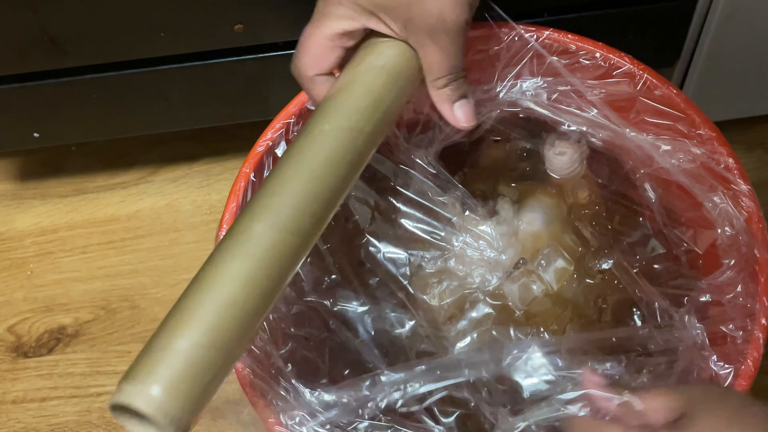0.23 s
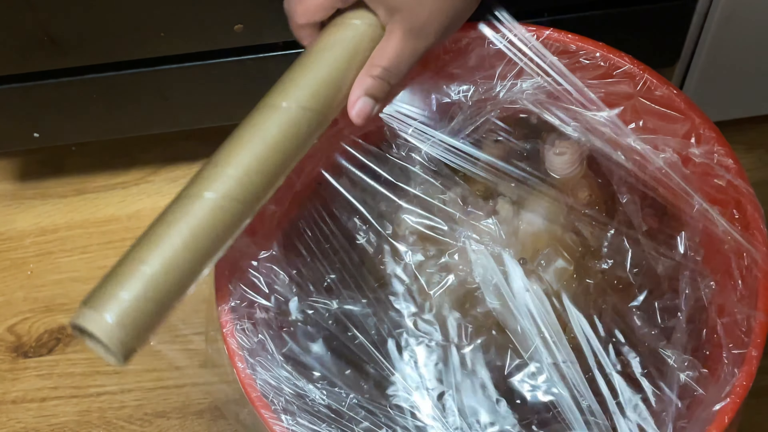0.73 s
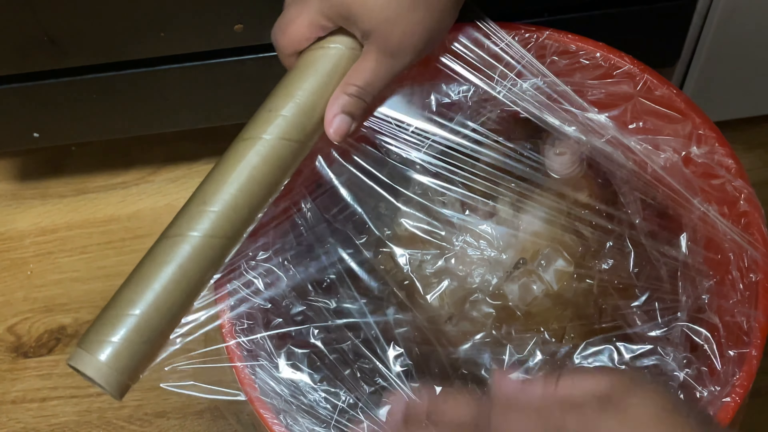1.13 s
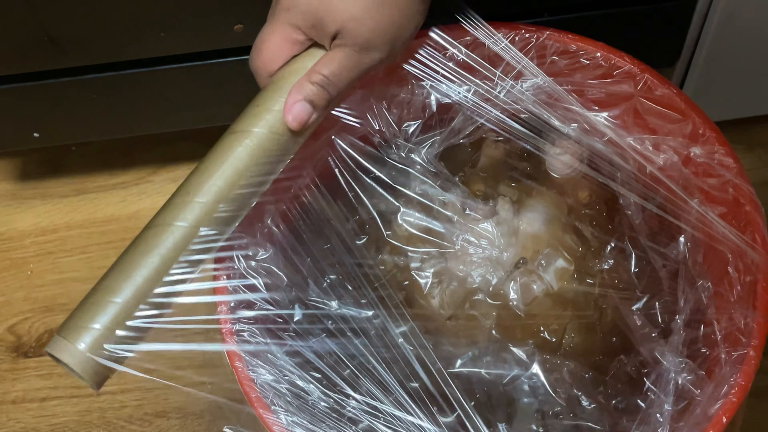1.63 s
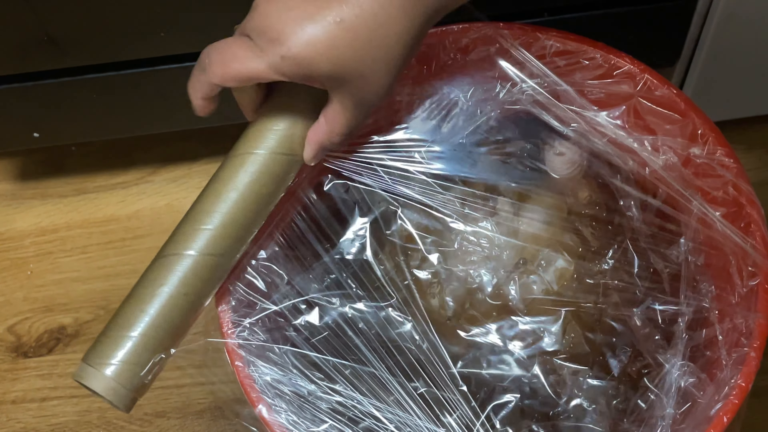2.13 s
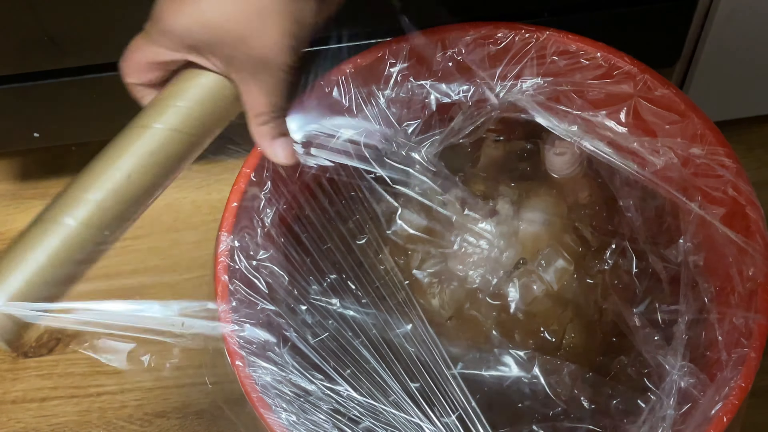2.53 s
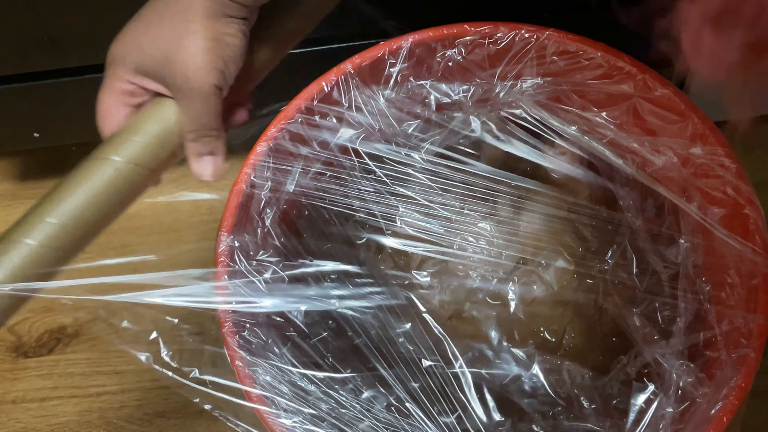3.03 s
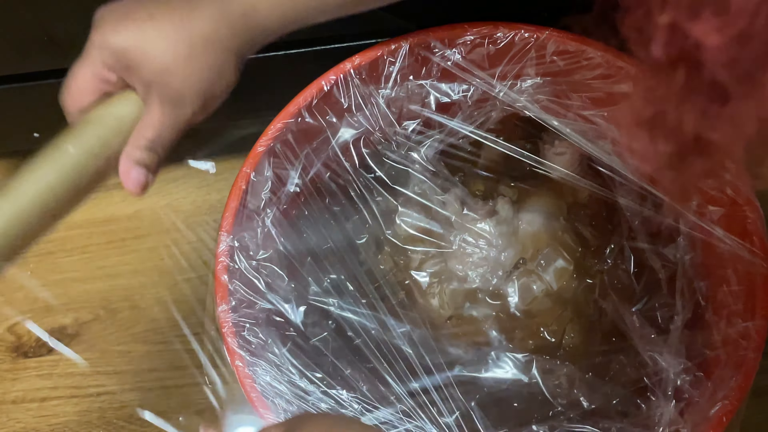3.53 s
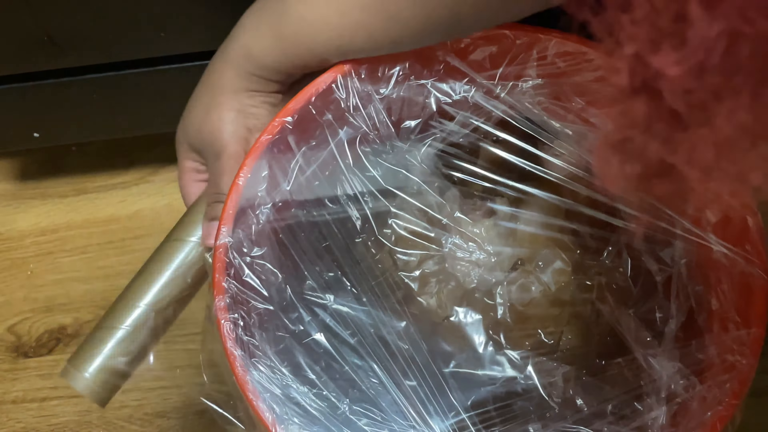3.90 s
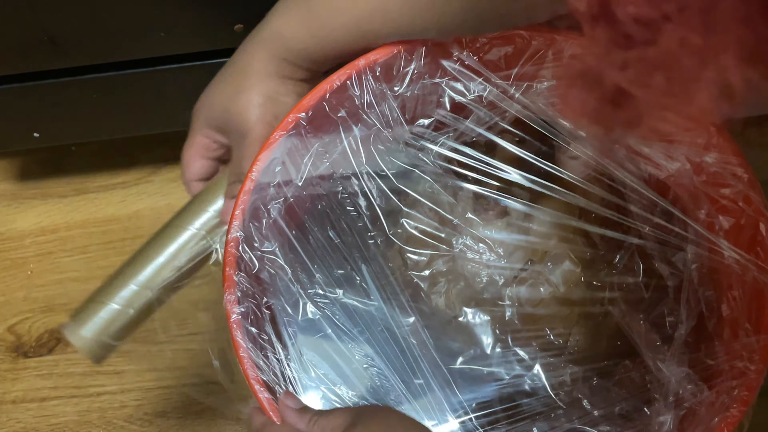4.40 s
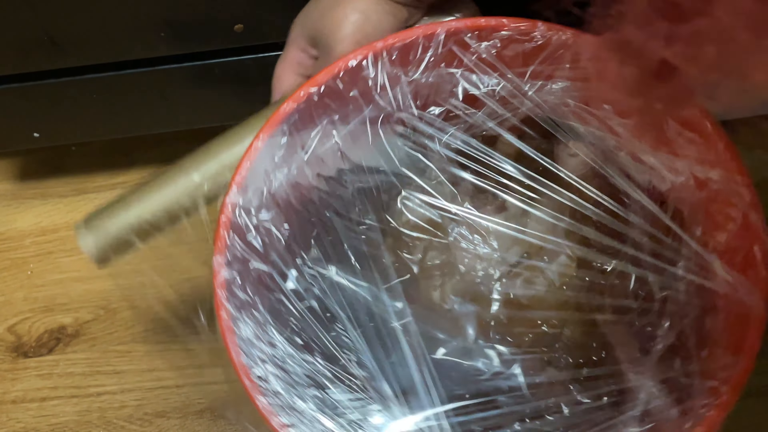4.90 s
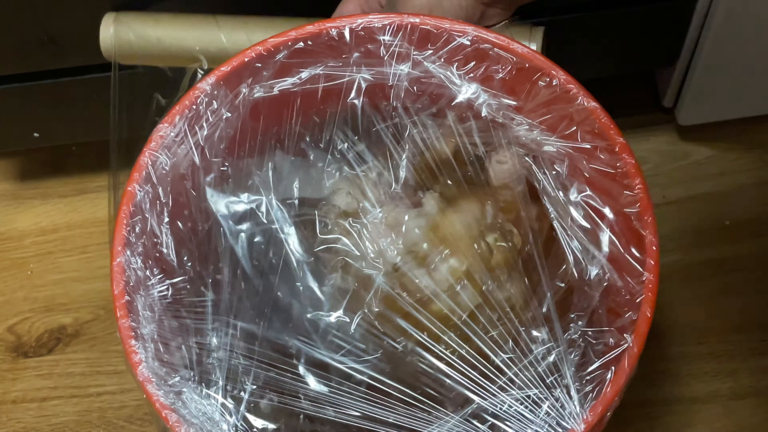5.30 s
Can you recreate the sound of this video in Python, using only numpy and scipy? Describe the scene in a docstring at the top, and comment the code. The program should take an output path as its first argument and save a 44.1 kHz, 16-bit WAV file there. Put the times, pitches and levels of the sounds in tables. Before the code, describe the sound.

Cling film is worked over a plastic bucket in a small, fairly dry kitchen, heard close in stereo. A faint low appliance hum and soft rumble run throughout. Light rustling opens the scene, then a cluster of hard, dry snaps with papery crackle hits around 0.45 s. Smaller crinkles follow, with a snap near 1.3 s and dull, drum-like thuds at about 1.75 s. After a quieter moment, the strongest pop comes at 2.25 s, the taut sheet thudding with a quickly falling pitch. Activity thins until 2.9 s, then dense sharp snapping runs from 3.1 to 3.6 s with soft low bumps of the bucket. A brief hollow plastic knock sounds at 3.9 s. Softer rustles follow, becoming a busy run of bright crinkles from 4.6 to 5.2 s. From about 5.2 s the bucket scrapes grittily over the boards, loudest near 5.5 s.

```python
"""A kitchen floor, where cling film comes off a cardboard roll and is stretched over a plastic bucket.
The film crinkles in swelling gritty noise and snaps in dry cracks with blurred rings; strong snaps set the
taut sheet thudding like a drum skin. The bucket bumps and rings as decaying sines, and finally slides in
dense noise grains. An appliance hums as wavering sines over filtered noise; two close ports pick it all up."""
import sys
import numpy as np
from scipy import signal
from scipy.fft import rfft, irfft, next_fast_len
from scipy.io import wavfile
from scipy.ndimage import map_coordinates

SR = 44100
rng = np.random.default_rng(int(sys.argv[2]) if len(sys.argv) > 2 else 0)


def store_pcm(level_fs):
    """Save levels as 16-bit WAV."""
    pcm = np.round(np.clip(level_fs, -1, 1) * 32767).astype(np.int16)
    wavfile.write(sys.argv[1], SR, np.atleast_2d(pcm).T)


def field_ratio(decibels):
    """Amplitude ratio for a level in dB (20 dB per decade); scalars and array-likes work."""
    return 10 ** (np.asarray(decibels, dtype=float) / 20)


N = 244735  # length in samples

# appliance tones: f/Hz, rms level/dB, wavering/dB (held within 0 to 4)
HUM_TONES = [(59.6, -56, 0), (114.9, -62, 2.5), (149.2, -68.5, -1), (194.6, -48.5, 1.1), (288, -69.5, 3),
             (469.5, -62, 2.5), (770, -69.5, 3), (1196, -70.5, 1.5)]
# spectrum of the air noise: f/Hz, relative level/dB
AIR_SPECTRUM = [(60, -28), (100, -9.5), (130, -5), (250, -7.5), (480, -15), (540, -20), (1100, -53),
                (2000, -33.5), (7000, -42.5), (15500, -49), (17000, -70)]
# spectrum of the rumble: f/Hz, relative level/dB
RUMBLE_SPECTRUM = [(20, -33), (35, -11.5), (55, 1), (75, -2.5), (100, -4.5), (200, -58)]
RUMBLE_DB, RUMBLE_SWING_DB = -55.5, 2  # distant rumble and its slow drift

# the bucket rocks and bumps the boards: t/s, relative level/dB, f/Hz
BUMPS = [(1.759, -37, 146), (2.28, -39, 166), (3.124, -36, 101), (3.43, -38.5, 84), (3.627, -38, 111),
         (5.378, -35, 98)]
# the roll knocks the bucket wall: t/s, relative level/dB
KNOCKS = [(3.9043, -18.5), (3.9290, -27.5)]
# modes of the bucket wall: f/Hz, relative level/dB, t60/s
WALL_MODES = [(1260, -5.5, .04), (1480, -10, .04), (1790, -14, 0.11), (2010, -9, 0.099), (2070, -15, 0.051),
              (2040, 2.5, 0.017), (2280, -10, 0.028), (2850, -9.5, 0.049)]
# the bucket dragged over the boards: t/s, level/dB
SLIDE_LEVEL = [(4.8, -68), (4.9, -51), (5.2, -47.5), (5.3, -35.5), (5.5, -30.5), (5.55, -37)]
# spectrum of the scraping base: f/Hz, relative level/dB
SCRAPE_SPECTRUM = [(60, -31), (97, 5), (150, -21), (260, -4), (470, 7), (640, -8), (830, 9), (1100, 1.5),
                   (2000, 5.5), (3500, -1.5), (7000, -14.5), (20000, -59)]

# tugs of the hands, each a swell of rustle: t/s of the peak, relative level/dB, rise/s and fall/s (over 20 dB),
# slack/dB (more = lower, floppier sound)
TUGS = [(.12, -57, 0.51, 0.13, -8), (.305, -45, 0.2, 0.028, 0.5), (0.446, -34, .14, 0.14, -0.5),
        (.49, -51, 0.049, 0.076, -4), (.6, -44, 0.22, 0.29, 0), (.75, -41, 0.086, 0.13, 0),
        (.82, -41.5, .1, 0.037, 1), (.96, -58, 0.027, 0.066, 8), (1.032, -48, 0.089, 0.11, 1.5),
        (1.22, -78, 0.022, 0.11, -18), (1.299, -36.5, 0.013, 0.031, 0), (1.439, -46, 0.2, 0.09, 5),
        (1.55, -48, 0.26, 0.24, -2.5), (1.64, -46.5, 0.032, 0.2, -2.5), (1.762, -56, 0.012, 0.051, 21.5),
        (1.841, -40.5, 0.019, 0.069, -4.5), (1.96, -51.5, 0.026, 0.061, 9), (2.12, -62, .2, 0.35, 4),
        (2.27, -35.5, 0.032, 0.057, 6.5), (2.3, -44.5, .04, 0.13, 6), (2.61, -45, 0.15, 0.073, 4),
        (2.77, -55, 0.027, 0.091, 5), (2.94, -49.5, .13, 0.17, 0.5), (3.11, -57.5, 0.061, 0.14, 15),
        (3.15, -35, .02, 0.024, 2), (3.212, -42.5, 0.022, 0.085, 9), (3.428, -38, 0.07, 0.084, 3),
        (3.628, -40, 0.051, 0.12, 1.5), (3.772, -40.5, 0.043, 0.1, 1), (3.909, -50, 0.036, .11, 14.5),
        (4.138, -47.5, 0.13, 0.27, 0), (4.27, -46, 0.071, 0.056, -10.5), (4.34, -43.5, 0.025, 0.11, 2),
        (4.4, -51, 0.02, 0.045, -2), (4.55, -47.5, 0.032, 0.079, 6.5), (4.651, -38, .12, 0.063, -1.5),
        (4.715, -49.5, 0.02, .05, 8.5), (4.738, -40, 0.039, 0.099, 1), (4.844, -47, 0.024, 0.04, 1),
        (4.87, -43.5, 0.038, 0.059, 4), (4.952, -40, 0.0083, 0.087, 0), (4.99, -48.5, .04, 0.025, -2),
        (5.13, -36, .012, 0.056, -1), (5.41, -48.5, 0.63, 1.7, 8)]
REST_DB = -69  # rustle between tugs, relative like the tugs
CREASE_FOLLOWS, FLAP_FOLLOWS = 0.98, 1.086  # dB gained by creases and flaps per dB of slack
# spectrum of the bright film: f/Hz, relative level/dB
FILM_SPECTRUM = [(1500, -10), (3500, -2.5), (4500, -1.5), (6500, -2.5), (9000, -3), (13000, -10),
                 (15500, -4.5), (20000, -5.5)]
# spectrum of the creases: f/Hz, relative level/dB
CREASE_SPECTRUM = [(500, -59), (900, -4.5), (1300, 3), (2000, 2.5), (3000, 1.5), (4000, -5), (7000, -16)]
# spectrum of the flapping sheet: f/Hz, relative level/dB
SHEET_SPECTRUM = [(80, -32), (200, 0.5), (300, 0.5), (420, 0), (560, -5), (680, -4.5), (810, -2),
                  (1100, -10), (2000, -36)]

# snaps of the film: t/s, then relative crack level/dB, crease level/dB and thud level/dB, nominal thud f/Hz
SNAPS = [(0.2935, -33.5, -43, -30.5, 376), (0.3638, -48, -43, -37, 447), (0.4461, -19.5, -13.5, -21, 360),
         (0.4595, -31, -24, -24, 333), (0.485, -19, -17, -27, 425), (0.5795, -30, -24, -38, 660),
         (.66, -29.5, -24.5, -54, 420), (.7744, -38, -26, -35.5, 860), (.828, -34, -33, -38, 400),
         (.87, -45.5, -40, -44, 397), (.904, -55, -43, -43, 358), (.967, -45, -45, -48, 406),
         (1.2156, -36, -58, -56, 235), (1.289, -29.5, -33.5, -25, 355), (1.306, -28, -46, -40, 362),
         (1.3765, -33.5, -33, -38, 334), (1.4152, -47, -50, -34, 412), (1.4303, -25, -20, -28.5, 396),
         (1.5524, -31, -33, -39, 432), (1.631, -30.5, -35, -35.5, 470), (1.6958, -36.5, -27, -45, 267),
         (1.7527, -52, -23, -18.5, 308), (1.7638, -55, -26, -20, 269), (1.8333, -31, -37, -43, 530),
         (1.9509, -37.5, -34.5, -43.5, 598), (2.223, -36, -43, -43, 370), (2.2398, -40, -29.5, -41, 323),
         (2.2636, -16, -19.5, -12, 352), (2.2943, -34, -24, -47, 570), (2.3489, -26, -27, -49, 363),
         (2.417, -38.5, -50, -42, 277), (2.4525, -40.5, -50, -42.5, 372), (2.485, -40, -58, -44, 250),
         (2.515, -45, -54, -51, 300), (2.5644, -36.5, -49, -34.5, 400), (2.8993, -42, -55, -53, 270),
         (2.9313, -37.5, -43, -35, 324), (2.9429, -32, -37, -36, 335), (3.08, -31.5, -30, -38.5, 455),
         (3.1053, -33, -25, -31, 570), (3.122, -19.5, -30, -21, 347), (3.1372, -21.5, -21, -31.5, 460),
         (3.1926, -24, -41, -34, 386), (3.2141, -22.5, -36, -30.5, 427), (3.2304, -30, -36, -31.5, 600),
         (3.288, -37, -50, -51, 300), (3.338, -38, -54, -56, 260), (3.3587, -42, -50, -54, 250),
         (3.3812, -28, -34, -34.5, 308), (3.3994, -21, -26, -29.5, 422), (3.4255, -19, -17, -37, 394),
         (3.5695, -28, -29, -37.5, 293), (3.611, -14.5, -22, -24.5, 290), (3.7156, -37, -42, -40.5, 380),
         (3.769, -31, -35, -48, 377), (3.8439, -33, -34, -48, 300), (3.9039, -56, -14.5, -39, 352),
         (4.1055, -44, -33, -58, 248), (4.1758, -44, -29, -58, 506), (4.3304, -34, -28.5, -37, 370),
         (4.3905, -34, -50, -40, 274), (4.5452, -42, -24, -43, 312), (4.6313, -27, -22.5, -47, 360),
         (4.7378, -30.5, -29, -41, 314), (4.8685, -29, -32, -41, 593), (4.9334, -34, -36, -45, 324),
         (4.948, -25.5, -47, -42, 414), (4.989, -31, -45, -45, 400), (5.076, -35, -48, -42, 402),
         (5.125, -23.5, -28, -33, 475), (5.161, -26, -16.5, -43, 530), (5.415, -36, -35, -36.5, 296),
         (5.5056, -47, -22, -28, 470)]
CREASE_RING_HZ, CREASE_RING_SPREAD = 2203, 0.16  # typical pitch of a crease, and its scatter as a share
OVERTONE_HZ, OVERTONE_DB, OVERTONE_T60_S = 777, -7, 0.023  # hollow ring with every thud, relative to it

# decay of the room: f/Hz, t60/s
KITCHEN_DECAY = [(200, 0.25), (1000, 0.24), (3000, 0.21), (10000, 0.19)]
# reflections of opposite sign at the two ports: f/Hz, level/dB relative to the shared sound
WIDTH = [(30, -13), (200, -18), (300, -15), (400, -13.5), (700, -9.5), (1300, -6), (2200, -11), (3200, -29),
         (6000, -53), (7000, -20.5), (8300, -22), (9500, -19), (16000, -21)]
# phase by which the right port leads the left: f/Hz, phase/rad
PORT_LEAD = [(0, 0), (5900, .05), (6550, .6), (7100, 1.25), (7650, 2.6), (8300, 3.14), (8800, 3.6),
             (9650, 4.6), (10600, 5.95), (11400, 6.28), (12400, 6.55), (13260, 7.5), (14500, 9.1),
             (15200, 9.42), (17000, 9.6)]
# microphone colour: f/Hz, level/dB
MIC_COLOUR = [(15700, -0.5), (16000, -14), (16500, -16), (20000, -50)]


def unit(x):
    """Scale to rms 1."""
    return x / np.sqrt(np.mean(x ** 2) + 1e-20)


def along(points, hz):
    """Read (Hz, value) points on a log frequency axis."""
    f, v = np.transpose(points)
    return np.interp(np.log(hz + 1), np.log(f + 1), v)


def curves(rows):
    """One value per sample for each column after the time."""
    s, *cols = np.transpose(rows)
    return [np.interp(np.arange(N) / SR, s, c) for c in cols]


def wobble(rate):
    """A smooth random curve, rate knots a second."""
    coarse = np.arange(0, N + 64, 64)
    knots = rng.standard_normal(int(N * rate / SR) + 4)
    smooth = map_coordinates(knots, [coarse * rate / SR])
    return np.interp(np.arange(N), coarse, smooth)


def filtered(x, response):
    """Filter x by a complex response of frequency."""
    m = next_fast_len(N + SR // 2)
    return irfft(rfft(x, m) * response(np.fft.rfftfreq(m, 1 / SR)), m)[..., :N]


def coloured(x, spectrum):
    """Shape x by (Hz, dB) points and scale to rms 1."""
    return unit(filtered(x, lambda hz: field_ratio(along(spectrum, hz))))


def gritty(count, spread_db, life):
    """A gate of random little bursts of very uneven size, each falling 60 dB in life seconds."""
    when, size = rng.random((count, 2)).T
    kicks = np.bincount((when * N).astype(int), field_ratio(-spread_db * np.log(size + 0.0018)), N)
    decay = field_ratio(-60 * np.arange(SR // 20) / SR / life)
    return signal.oaconvolve(kicks, decay)[:N]


def tail(t60s):
    """Reverberant noise of energy 1 whose every frequency dies at its own speed."""
    hz, t, z = signal.stft(rng.standard_normal(SR // 2), SR, nperseg=256)
    decay = field_ratio(-60 * t / along(t60s, hz)[:, None])
    fading = signal.istft(z * decay, SR, nperseg=256)[1]
    return fading / np.linalg.norm(fading)


def background():
    """Wavering appliance tones over air noise and a slowly changing rumble."""
    t = np.arange(N) / SR
    tones = np.zeros(N)
    for hz, db, waver_db in HUM_TONES:
        level = field_ratio(db + 3.0 + np.clip(waver_db, 0, 4) * wobble(9))  # 3 dB: rms to sine peak
        tones += level * np.sin(2 * np.pi * hz * t + 0.26 * wobble(7.2))
    air_noise, bass_noise = rng.standard_normal((2, N))
    air = field_ratio(-54.5) * coloured(air_noise, AIR_SPECTRUM)
    rumble_level = field_ratio(RUMBLE_DB + RUMBLE_SWING_DB * wobble(2.8))
    return tones + air + rumble_level * coloured(bass_noise, RUMBLE_SPECTRUM)


def bucket():
    """The bucket's body: low soft bumps on the floor, and hollow knocks that ring the modes of the wall."""
    out, t = np.zeros(N + SR), np.arange(SR // 5) / SR
    for s, db, hz in BUMPS:
        soft_start = 1 - np.exp(-t / 0.0055)
        bump = field_ratio(db + 5.0 - 60 * t / 0.14) * soft_start * np.sin(2 * np.pi * hz * t)
        out[round(s * SR):][:len(t)] += bump
    for s, db in KNOCKS:
        ring = np.zeros(len(t))
        for hz, level_db, t60 in WALL_MODES:
            scatter_db = rng.normal(0, 2.1)  # every knock excites the modes a little differently
            ring += field_ratio(level_db + scatter_db - 60 * t / t60) * np.sin(2 * np.pi * hz * t)
        out[round(s * SR):][:len(t)] += field_ratio(db) * (1 - np.exp(-t / 0.00064)) * ring
    return out[:N]


def slide():
    """The bucket's base scrapes in dense grains over the floor."""
    level_db, = curves(SLIDE_LEVEL)
    grains = gritty(count=4500, spread_db=3.0, life=0.077) * rng.standard_normal(N)
    return field_ratio(level_db + 1.6 * wobble(30)) * coloured(grains, SCRAPE_SPECTRUM)


def tugs(follows):
    """The rustle's envelope: every tug swells and dies; slack film lifts a layer by follows dB per dB."""
    out, t = np.full(N, field_ratio(REST_DB)), np.arange(N) / SR
    for s, db, rise, fall, slack_db in TUGS:
        near = slice(max(0, round((s - 2 * rise) * SR)), round((s + 2 * fall) * SR))
        away = np.maximum((s - t[near]) / rise, (t[near] - s) / fall)
        out[near] += field_ratio(db + follows * slack_db - 20 * away)
    return out


def crinkle():
    """Countless tiny creases tick, small ones high and large ones lower; the slack sheet flaps below them."""
    noise = rng.standard_normal((3, N))
    common = gritty(count=4000, spread_db=5.0, life=0.053)
    small = gritty(count=5000, spread_db=3.5, life=0.0057)
    large = gritty(count=3000, spread_db=1.0, life=0.011)
    flap_gate = gritty(count=2000, spread_db=5.0, life=0.031)
    bright = coloured((common + 4.0 * small) * noise[0], FILM_SPECTRUM)
    creases = coloured((common + 1.54 * large) * noise[1], CREASE_SPECTRUM)
    flaps = coloured(flap_gate * noise[2], SHEET_SPECTRUM)
    out = field_ratio(0.5) * tugs(0) * bright
    out += field_ratio(-5.0) * tugs(CREASE_FOLLOWS) * creases
    return out + field_ratio(-4.5) * tugs(FLAP_FOLLOWS) * flaps


def snaps():
    """A crease buckles with a dry crack and a blurred ring; the taut sheet follows with a thud of falling pitch."""
    cracks, tones, t = np.zeros(N + SR), np.zeros(N + SR), np.arange(SR // 10) / SR
    for s, crack_db, ring_db, thud_db, thud_hz in SNAPS:
        at = slice(round(s * SR), round(s * SR) + len(t))
        noise = rng.standard_normal((2, len(t)))

        # a quick burst with a fainter, longer tail shapes both crack and ring
        burst = (1 - np.exp(-t / 0.00077)) * (field_ratio(-60 * t / 0.0072) + .14 * field_ratio(-60 * t / 0.092))
        click = 0.72 * field_ratio(-60 * t / 0.0021)
        cracks[at] += field_ratio(crack_db + 8.5) * (burst + click) * noise[0]

        ring_hz = CREASE_RING_HZ * np.exp(CREASE_RING_SPREAD * rng.standard_normal())
        jitter = np.cumsum(0.33 * noise[1])  # phase noise smears the ring over a wide band
        ring = burst * np.sin(2 * np.pi * ring_hz * t + jitter)

        # hard blows stretch the sheet: the thud starts high and sags to just under its nominal pitch
        stretch_hz = (1050 - thud_hz) * min(1, field_ratio(thud_db + 17.5))
        turns = 0.915 * thud_hz * t + stretch_hz * 0.00309 * (1 - np.exp(-t / 0.0019))
        thud_shape = (1 - np.exp(-t / 0.004)) ** 2 * field_ratio(-60 * t / 0.035)
        thud = thud_shape * np.sin(2 * np.pi * turns + 0.19 * jitter)
        overtone_shape = field_ratio(OVERTONE_DB - 60 * t / OVERTONE_T60_S) * (1 - np.exp(-t / 0.0017))
        thud += overtone_shape * np.sin(2 * np.pi * OVERTONE_HZ * t + 0.34 * jitter)
        tones[at] += field_ratio(ring_db + 4.0) * ring + field_ratio(thud_db + 10.5) * thud
    bright = filtered(cracks[:N], lambda hz: field_ratio(along(FILM_SPECTRUM, hz)))
    mellow = filtered(tones[:N], lambda hz: 1 / (1 + 1j * hz / 4500) ** 2)  # rings hold little treble
    return bright + mellow


def scene():
    """All sources in the room; short reflections, changing as the hands move, reach the ports with opposite sign."""
    near = crinkle() + snaps() + bucket() + slide()
    delayed = np.pad(near, (150, 0))  # samples
    room = field_ratio(-12.5) * signal.oaconvolve(delayed, tail(KITCHEN_DECAY))[:N]
    shared = near + room + background()

    turn = 2.8 * wobble(2.9)  # radians: drifts between two sets of reflections
    reflections = np.zeros(N)
    for share in (np.cos(turn), np.sin(turn)):
        short_tail = tail([(300, 0.11), (3000, 0.058)])[:SR // 8]
        reflections += signal.oaconvolve(share * shared, short_tail)[:N]
    apart = filtered(reflections, lambda hz: field_ratio(along(WIDTH, hz)))
    return np.array([shared + apart, shared - apart])


def band_limit(x):
    """A steep low-pass at the top of the band."""
    return signal.sosfilt(signal.butter(12, 16520, fs=SR, output="sos"), x)


def record(dry):
    """Two microphone ports: in the treble they drift out of phase and finally roll off."""
    def port_response(hz):
        half_lead = np.outer([-1, 1], along(PORT_LEAD, hz))  # left lags, right leads, half each
        return field_ratio(along(MIC_COLOUR, hz)) * np.exp(.5j * half_lead)

    ports = filtered(dry, port_response)
    return band_limit(ports)


dry = scene()
out = record(dry)
store_pcm(out)
```